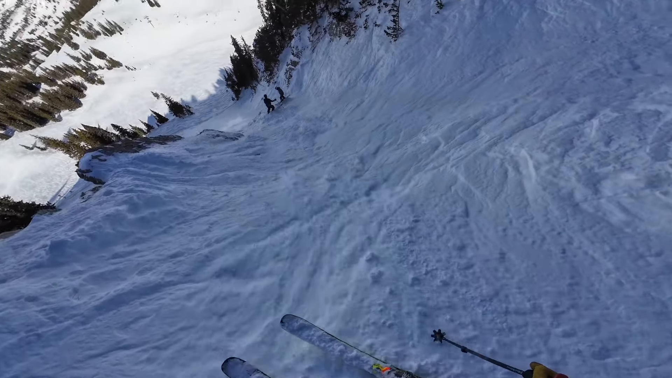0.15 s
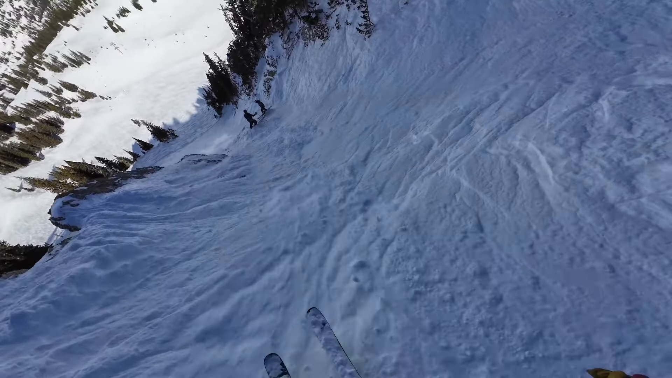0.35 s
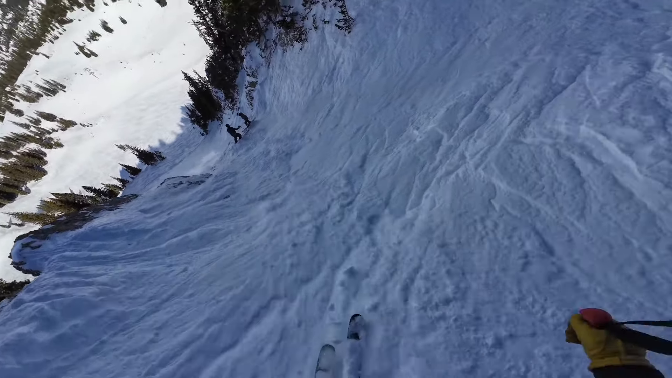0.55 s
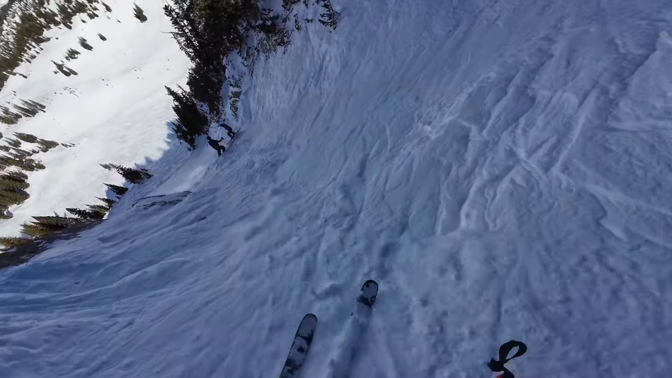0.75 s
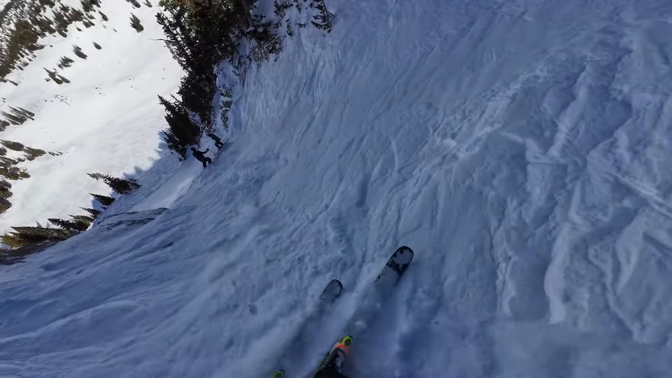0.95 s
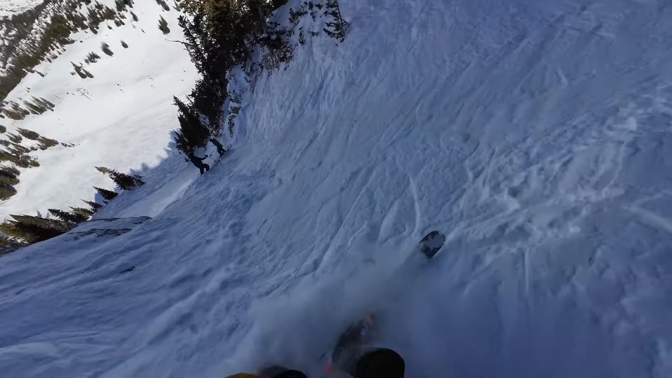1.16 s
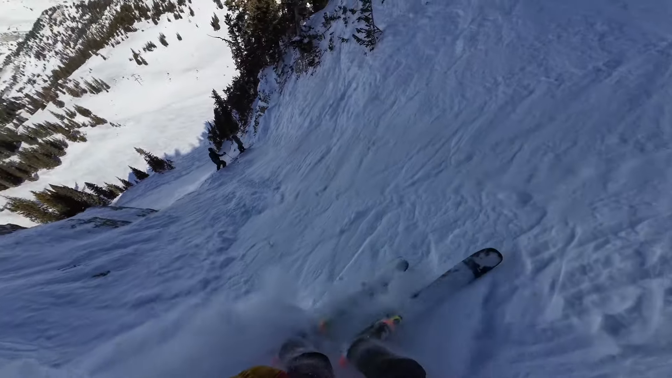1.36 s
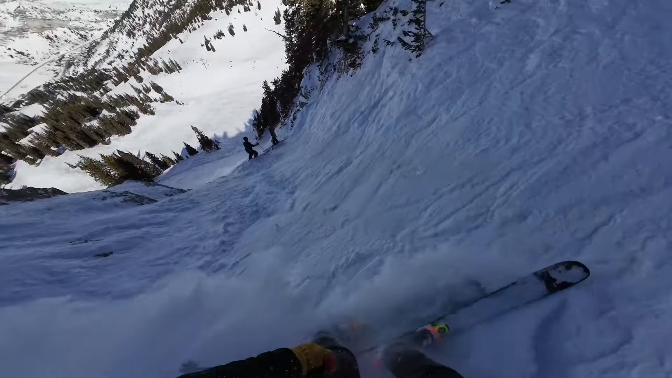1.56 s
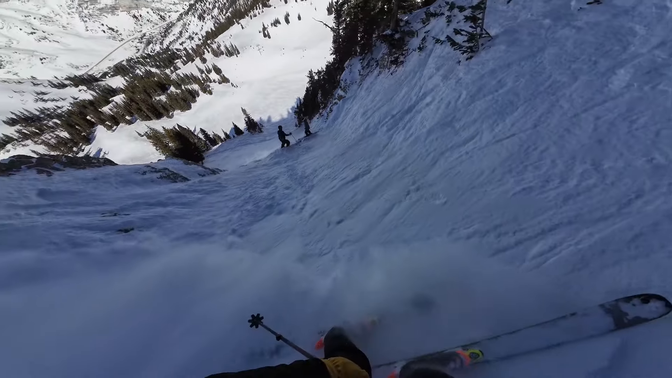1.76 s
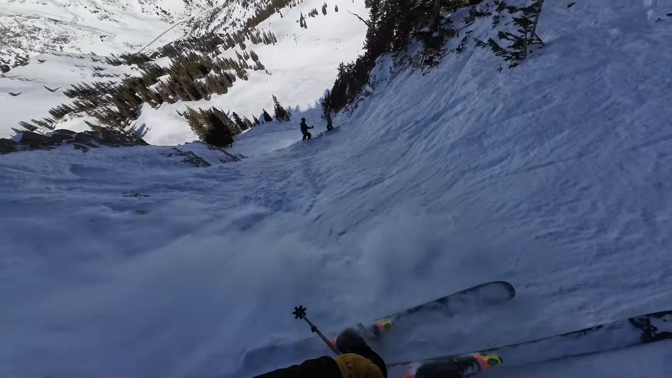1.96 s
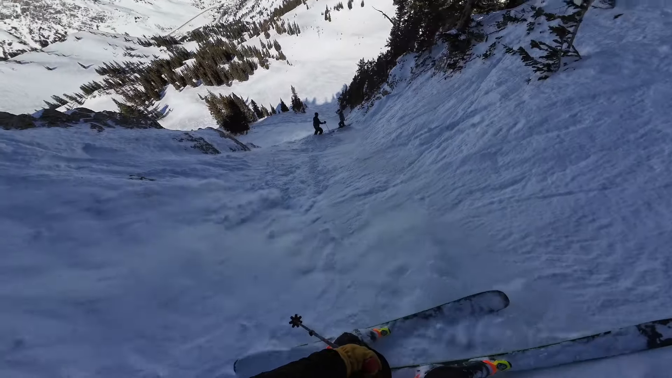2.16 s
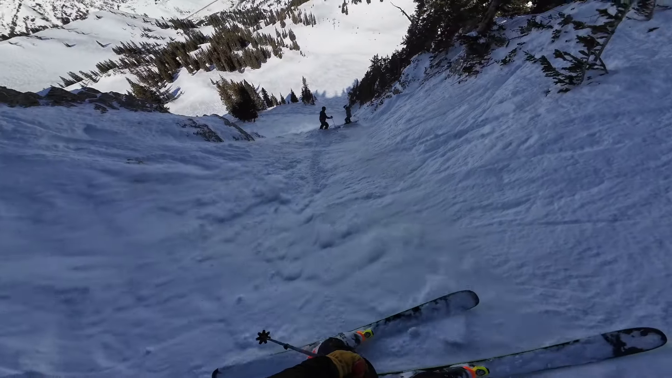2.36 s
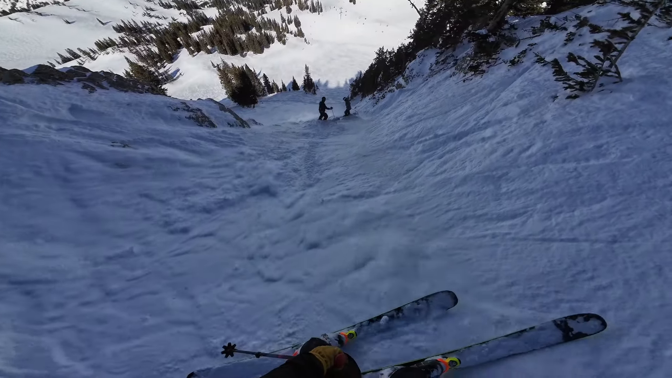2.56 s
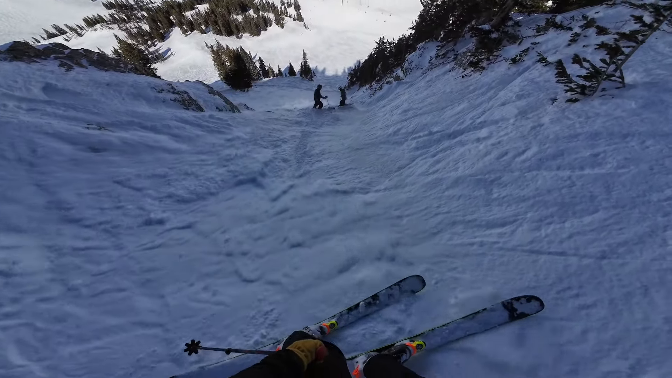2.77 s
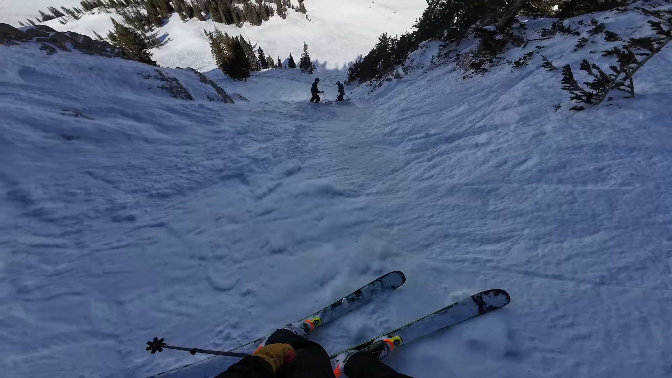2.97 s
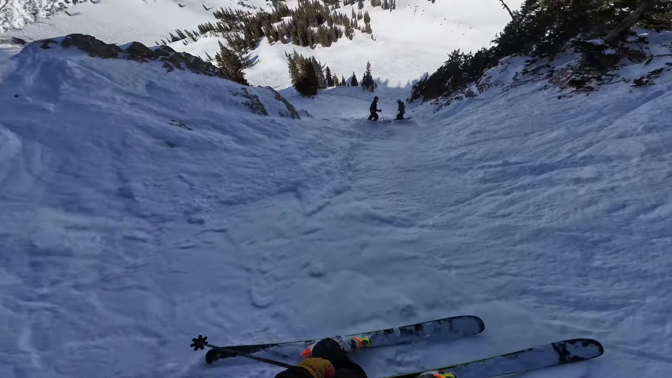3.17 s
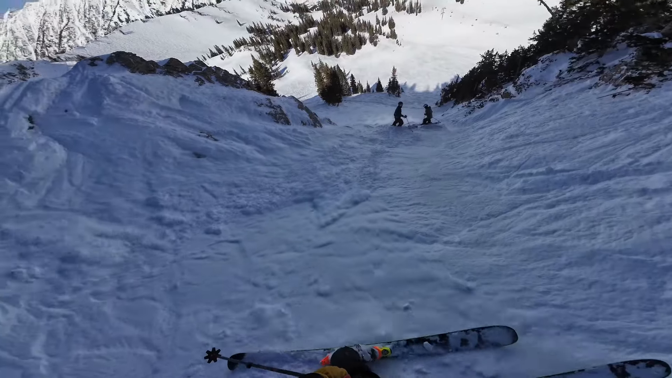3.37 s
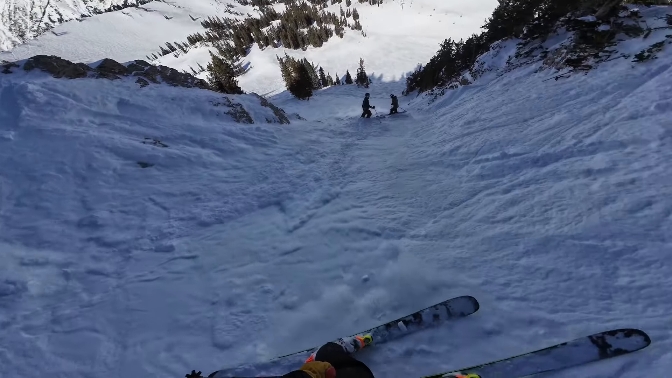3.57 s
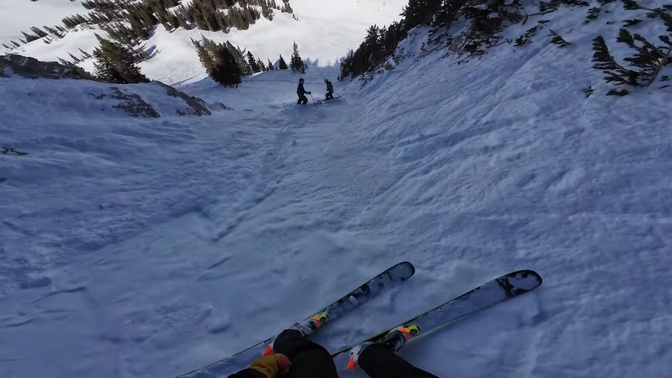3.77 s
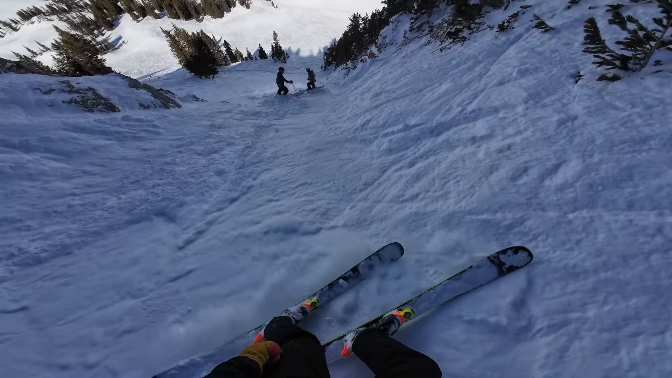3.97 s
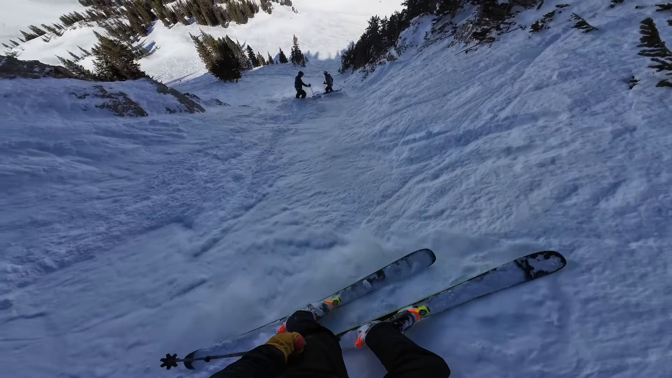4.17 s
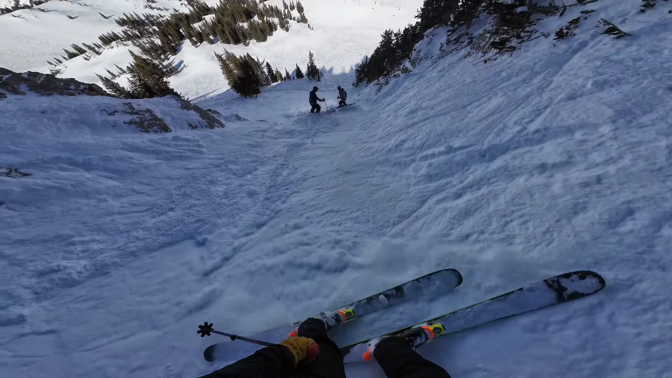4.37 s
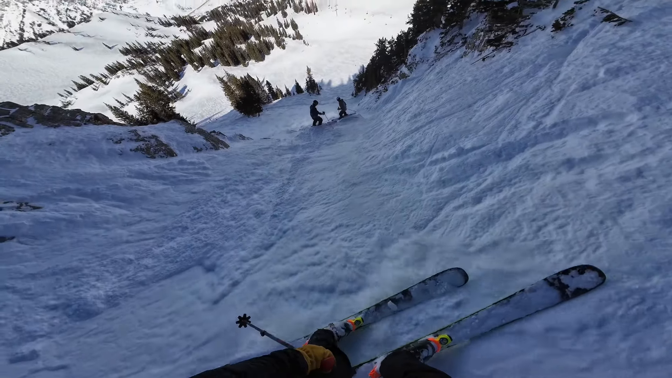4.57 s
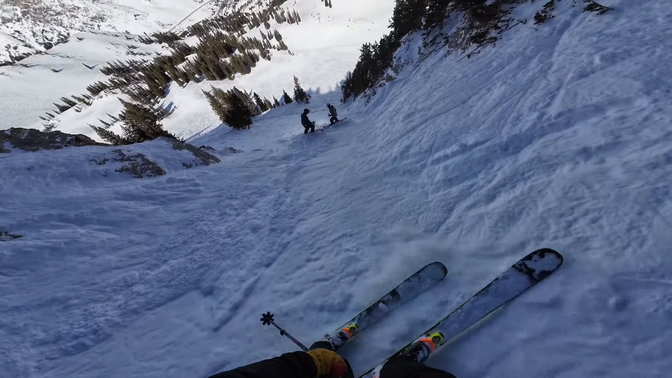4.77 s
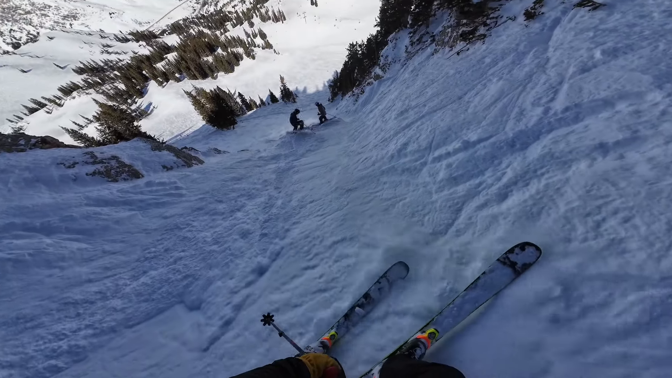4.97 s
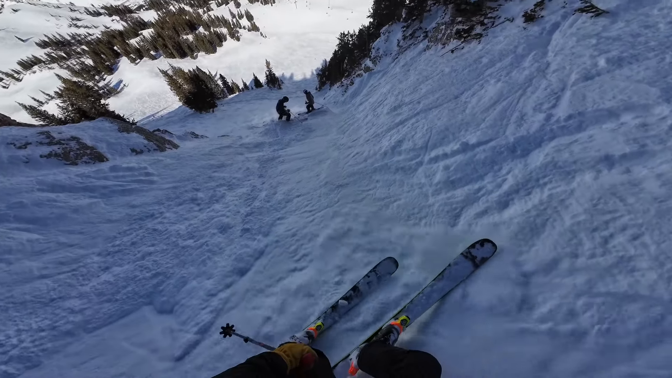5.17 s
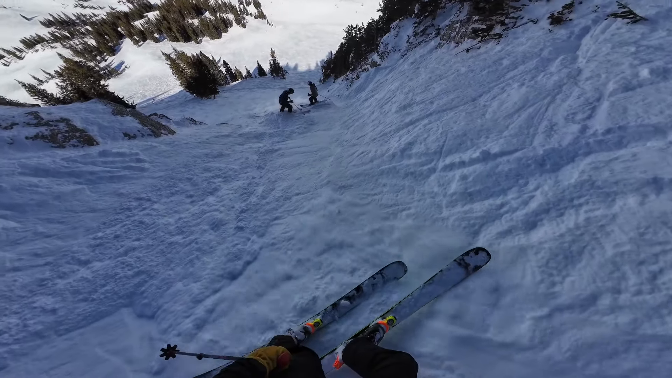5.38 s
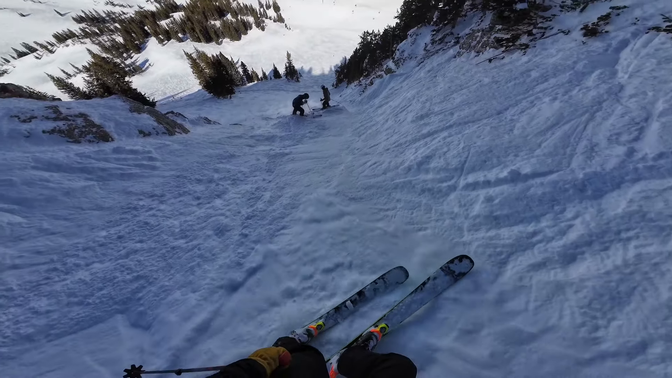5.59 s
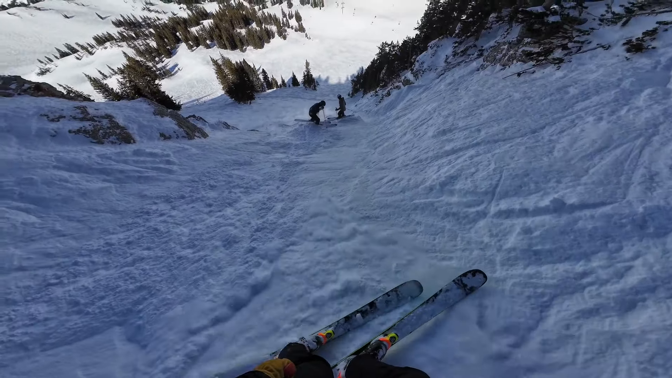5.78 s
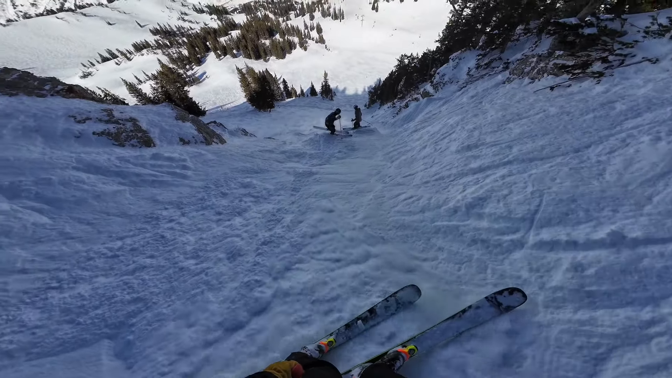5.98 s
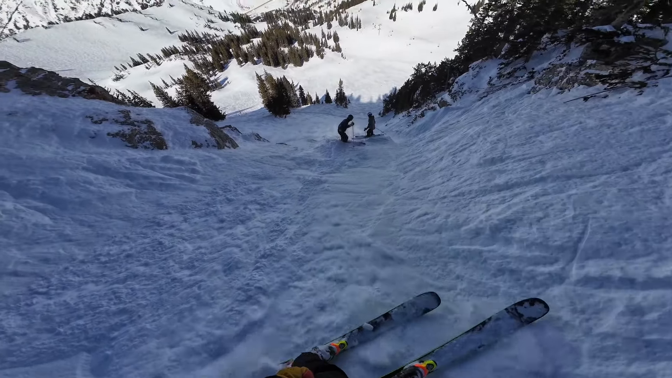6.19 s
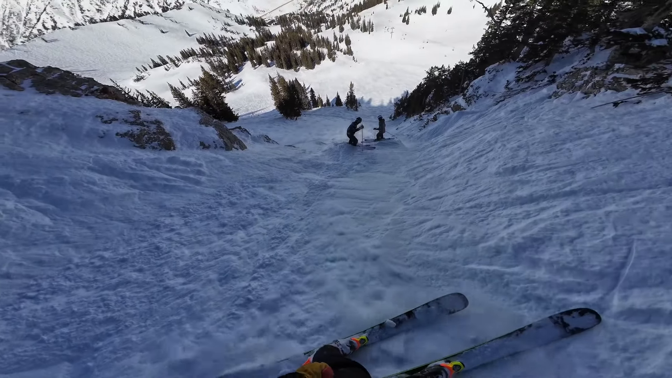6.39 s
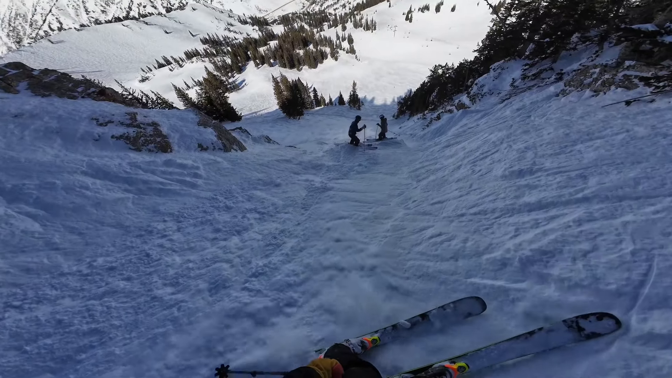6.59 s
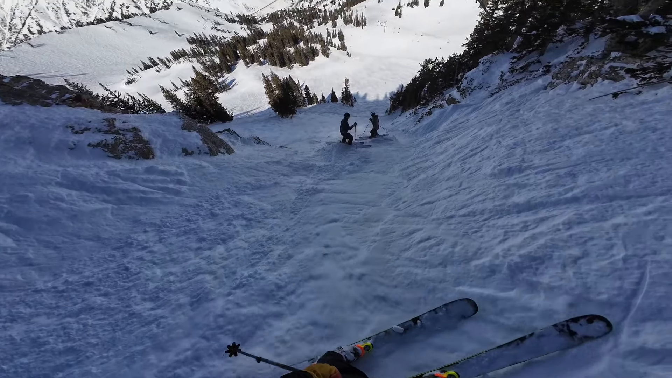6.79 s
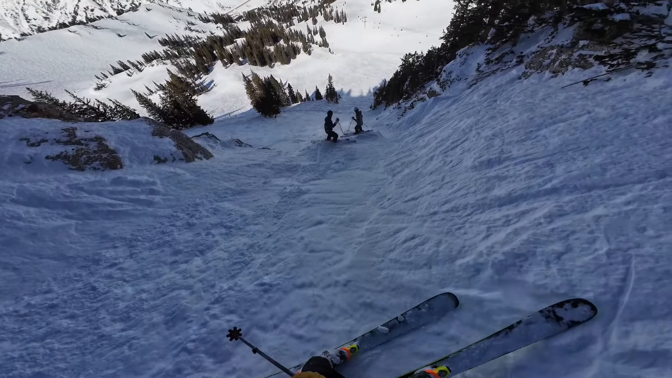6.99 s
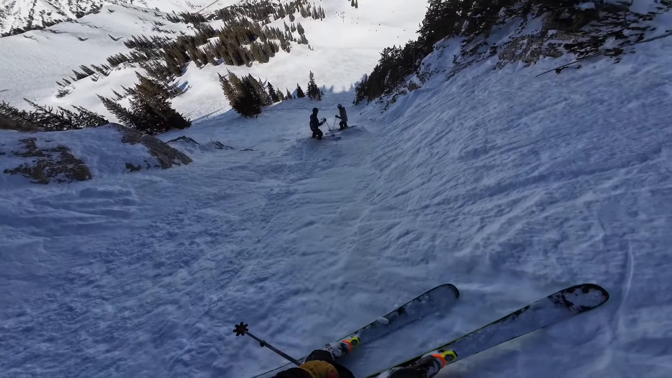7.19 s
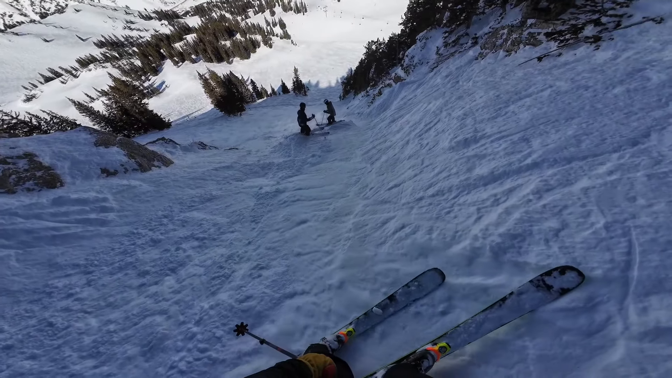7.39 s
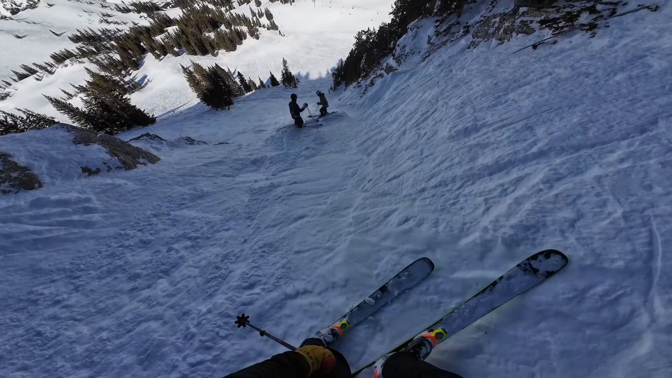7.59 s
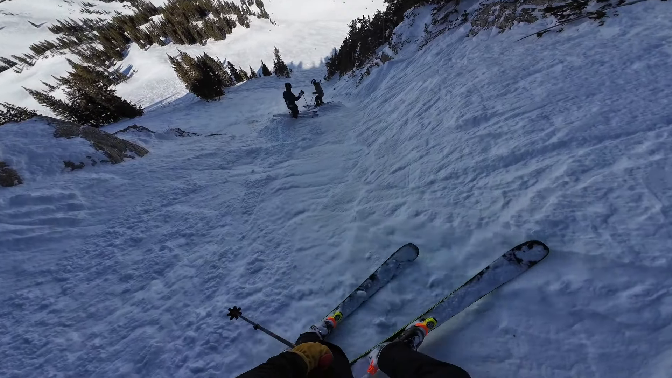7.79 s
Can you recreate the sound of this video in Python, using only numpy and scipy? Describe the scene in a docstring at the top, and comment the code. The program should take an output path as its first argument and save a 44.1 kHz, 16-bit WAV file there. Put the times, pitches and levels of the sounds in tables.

```python
"""Skidding down a windy gully

A skier drops into a steep gully, throws the skis sideways and skids down over chopped snow.
Skis: random grain clicks and noise, coloured and ringing, make the scrape, hiss, spray and crackle.
Wind on the helmet microphone: shaped noise rumbles, buffets and flutters; wandering sines throb in gusts.
Single eddies pop on the microphone port as short pressure swings with a higher crack."""
import sys
import numpy as np
from scipy import signal
from scipy.fft import rfft, irfft
from scipy.io import wavfile
from scipy.ndimage import uniform_filter1d

SR = 44100
rng = np.random.default_rng(int(sys.argv[2]) if len(sys.argv) > 2 else 0)


def to_wav(s):
    """Save 16-bit WAV."""
    ch = np.atleast_2d(s).T  # columns
    pcm = np.round(np.clip(ch, -1, 1) * 32767)  # PCM
    wavfile.write(sys.argv[1], SR, pcm.astype(np.int16))


N = 345744  # length [samples]

# Levels in the tables are starting points: the sources add trims and random movement.

# how hard the skis skid and how much powder they throw: (time [s], scrape level [dB], spray level [dB])
SKID_CURVE = [(0.0, -38.5, -47), (0.09, -43, -49.5), (0.3, -42.5, -48.5), (0.36, -44.5, -53),
              (0.51, -45.5, -50), (0.6, -35.5, -45), (0.78, -29, -42), (0.96, -29.5, -42),
              (1.01, -36, -45.5), (1.09, -25, -36.5), (1.7, -23, -36), (2.52, -25.5, -39),
              (2.64, -27, -39.5), (2.85, -24, -36), (3.3, -24.5, -40), (3.8, -22.5, -36),
              (4.28, -23.5, -35.7), (4.75, -24.5, -39.5), (5.02, -27.5, -42.5), (5.5, -27, -39.5),
              (5.94, -24.5, -40), (6.33, -20.5, -35), (6.56, -24.5, -38.5), (6.86, -31.5, -46.5),
              (7.04, -24.5, -38.5), (7.41, -29.5, -44), (7.52, -34, -49), (7.64, -30, -46.5),
              (7.78, -25, -41.5)]
# the edges dig in (+) or let go (-) for a moment:
# (centre time [s], length [s], scrape and spray change [dB], bite change [dB])
EDGE_DIGS = [(1.135, 0.054, 5.5, 8), (1.235, 0.03, -2, 4), (1.28, 0.06, 5.5, 4), (1.39, 0.18, -3, -0.5),
             (1.45, 0.092, 3.5, 2.5), (1.73, 0.11, -4, -2), (2.28, 0.074, -2, -2), (2.43, 0.062, -0.5, 2),
             (2.65, 0.18, 2.5, 5), (2.83, 0.1, 2, 3), (4.99, 0.2, 0, -3), (5.22, 0.09, 1, 5.5),
             (5.48, 0.24, 3.5, 4), (5.57, 0.058, -2.5, -5), (5.68, 0.13, 2, 1), (6.12, 0.16, 1.5, -0.5),
             (6.24, 0.16, 0, -2), (7.39, 0.14, 3, 3)]
# hollow colour of the scrape where the skis dig in:
# (time [s], resonance [Hz], level over the scrape grains [dB])
HOLLOW_GLIDE = [(0, 1350, -15), (0.5, 820, 6), (0.9, 900, -28), (1.27, 1950, -4), (1.6, 1440, -19),
                (2.8, 1760, -5), (3.05, 1690, -10), (3.36, 1400, -24), (3.6, 1450, -12), (4.3, 1470, -4),
                (4.98, 890, -36), (5.19, 1180, 1.5), (5.45, 1370, -17), (5.78, 1610, -2.5), (6.1, 960, -14),
                (6.42, 1880, -5.5), (6.7, 1490, -17), (7.25, 1350, -2), (7.55, 1590, -20), (7.8, 2090, -6)]
# faint gliding ring in the hiss as the edge angle changes:
# (time [s], resonance [Hz], level over the undulled bite [dB])
EDGE_RING_GLIDE = [(0, 2500, -2), (0.6, 2600, -28), (1.13, 3700, -8), (2.0, 2550, -14), (2.42, 2500, -2),
                   (2.7, 2600, -8), (3.7, 2630, -6), (4.1, 2940, -2.5), (4.7, 3550, -8), (5.0, 3230, -9),
                   (5.22, 3740, -20), (5.47, 4050, -8), (5.57, 4670, -11), (5.7, 4930, -7),
                   (5.9, 4700, -10), (6.1, 4450, -9), (6.35, 2600, -15), (6.55, 3000, -5),
                   (7.84, 2700, -25)]
# upper edge of the bite's hiss, rising and falling: (time [s], low-pass corner [Hz])
BITE_TOP_GLIDE = [(0, 5500), (1.25, 6840), (1.7, 6440), (2.1, 5300), (2.65, 7160), (3.15, 5550),
                  (3.55, 6600), (3.9, 5600), (4.4, 7460), (5.2, 4980), (5.5, 5360), (5.8, 4800),
                  (6.05, 5470), (6.35, 8000), (6.9, 7500), (7.3, 6040)]
# airflow on the microphone: (time [s], rumble level [dB], buffet level [dB])
WIND_CURVE = [(0.0, -43, -31), (0.07, -24, -23.5), (0.28, -31, -21.5), (0.6, -29, -19.5), (0.8, -19, -15),
              (1.4, -25, -15), (1.63, -30, -22), (1.72, -28, -26.5), (1.97, -27, -28), (2.06, -32, -22),
              (2.75, -33, -26), (3.15, -25.5, -18.5), (3.95, -35, -32), (4.32, -33, -25),
              (4.44, -42, -37.5), (5.05, -39.5, -33), (5.33, -29.5, -26.5), (6.6, -26.5, -34),
              (7.0, -14.5, -18.5), (7.17, -31.5, -25), (7.75, -26, -24), (7.84, -30, -32)]
# brief gusts on top of the airflow: (centre time [s], length [s], rumble change [dB], buffet change [dB])
GUST_SWELLS = [(.87, 0.082, 3, 5), (1.19, 0.068, 10, -9), (1.35, 0.086, 14.5, 0.5), (3.21, 0.079, 12, -6.5),
               (3.46, 0.053, 13, -3), (3.68, .08, 1, 7), (4.26, 0.066, 12, 1.5), (6.2, 0.086, 7.5, -1),
               (7.28, 0.11, 14, -8), (7.45, 0.055, 18, -2)]
# flurries of small eddies: (start time [s], hold length [s], level [dB])
EDDY_FLURRIES = [(0.064, 0.054, -24.5), (0.323, 0.29, -31), (0.661, 0.069, -22), (0.843, 0.15, -20.5),
                 (1.05, 0.14, -25), (1.492, 0.17, -22), (2.047, 0.087, -19), (2.178, 0.059, -22),
                 (2.332, 0.17, -22), (2.589, 0.16, -25.5), (2.912, 0.14, -23.5), (3.067, 0.025, -20),
                 (3.172, 0.26, -22), (3.467, 0.0085, -18), (3.62, 0.1, -26), (3.777, 0.055, -30.5),
                 (4.012, 0.18, -26), (5.562, 0.36, -32.5), (6.988, 0.14, -27.5), (7.254, 0.14, -27),
                 (7.445, 0.038, -23.5), (7.5, 0.083, -28), (7.592, 0.17, -21)]
# strongest eddies hitting the port: (centre time [s], swing level [dB], swing rate [Hz], crack level [dB])
PORT_POPS = [(0.110, -11, 900, -24), (0.115, -1, 390, -22), (0.201, -3.5, 266.5, -19),
             (0.689, -9.5, 332, -22), (0.906, -6, 330, -17), (0.956, -2, 296, -32), (1.008, 5, 120, -34),
             (1.117, -14, 480, -9), (1.131, -3.5, 258, -18), (1.183, 0.5, 288, -22), (1.55, -5, 200, -18),
             (2.037, -1.5, 230, -22), (2.062, -5, 328, -15), (2.069, -2, 300, -14), (2.087, -17, 280, -25),
             (2.096, -8, 380, -11), (2.117, -10, 201, -28), (2.183, -11, 220, -26), (2.371, -4, 332, -22),
             (2.412, -4, 277, -23), (2.483, -2.5, 287, -28), (2.924, -5, 258, -20), (2.965, -5.5, 218, -23),
             (3.093, -8, 301, -28), (3.105, 1, 280, -21), (3.183, 0.5, 206, -19), (3.229, 3, 170, -19),
             (3.317, -19, 400, -11), (3.404, -12, 400, -12), (3.471, -2, 129, -13), (3.68, 0.5, 190, -22),
             (4.167, -2, 267, -29), (4.289, -8, 100, -23), (5.327, -1, 196, -30), (5.598, -8, 280, -14),
             (5.644, -8.5, 138, -27), (5.706, -11, 298, -27), (5.785, -7, 320, -24),
             (6.705, -11.5, 179, -30), (6.935, -7, 179, -22), (6.964, 0, 89.5, -30), (6.991, -5, 218, -18),
             (7.001, -3, 228, -14), (7.016, -7, 260, -13), (7.062, -11, 278, -24), (7.08, -3, 226, -24),
             (7.131, -8, 270, -27), (7.26, -7, 262, -13), (7.361, -15, 260, -26), (7.444, 1.5, 110, -22),
             (7.474, 1, 282, -31), (7.595, -8, 250, -28), (7.723, -19, 270, -24)]
# throbs in the strongest gusts: (centre time [s], length [s], peak level [dB], mean rate [Hz])
GUST_THROBS = [(0.357, 0.073, -6.5, 87.6), (0.423, 0.045, -8, 85), (0.55, 0.033, -5, 110),
               (0.708, 0.074, -1.5, 100), (0.853, 0.11, -9.5, 90), (0.923, 0.046, -12, 129.4),
               (0.983, 0.095, -5.5, 105.1), (1.057, 0.042, -1.5, 119.6), (1.175, 0.046, -3.5, 94.6),
               (1.24, 0.059, -5, 91.2), (1.323, 0.05, -4.5, 85.2), (1.399, 0.062, -2.5, 100.5),
               (1.561, 0.062, -4.5, 115), (1.633, 0.033, -3, 115), (2.978, 0.026, -7, 118.6),
               (3.105, 0.02, -8, 140), (3.26, 0.066, -15.5, 130)]

# relative spectra of the snow layers: (frequency [Hz], density [dB per Hz])
SCRAPE_SPECTRUM = [(150, -12), (280, -4.5), (400, -2), (550, 1.5), (800, 2.5), (1200, 1), (1850, 0.5),
                   (2300, -9), (3000, -20), (5000, -13.5)]
BITE_SPECTRUM = [(1300, -27), (2100, 1.5), (2750, 3.5), (3300, -2), (4000, -3.5), (4800, -6.5), (5600, -12),
                 (6400, -8.5), (7200, -15.5), (10000, -11.5)]
SPRAY_SPECTRUM = [(3500, -26), (6000, 0), (7000, -6), (7900, 3), (8600, 0), (9500, 3.5), (10300, 3.5),
                  (11000, -1.5), (12300, -1), (13200, 4.5), (14200, -2.5), (15700, -9)]
CRUMB_SPECTRUM = [(400, -26), (1200, 8), (2500, -6), (5000, 8), (8000, -16)]
# relative spectra of the wind, from large eddies to fine: (frequency [Hz], density [dB per Hz])
RUMBLE_SPECTRUM = [(12, -3), (22, 0), (35, 1.5), (55, 0.5), (80, -3.5), (140, -43)]
BUFFET_SPECTRUM = [(35, -21), (60, -2), (90, -1), (125, -2.5), (170, -12.5), (250, -18.5), (500, -38)]
FLUTTER_SPECTRUM = [(100, 1.5), (160, 4), (220, 0.5), (310, -5), (450, -10), (700, -17), (1200, -36),
                    (2500, -73)]
FINE_EDDY_SPECTRUM = [(300, -4.5), (550, -3), (1200, -12.5)]

# the bite sits at BITE_DB when the scrape is at FULL_SKID_DB, and moves BITE_FOLLOWS dB per scrape dB
FULL_SKID_DB, BITE_DB, BITE_FOLLOWS = -24.5, -29, 1.07
PATCH_LOW_HZ, PATCH_HIGH_HZ = 400, 9000  # centres of the lowest and highest snow-patch bands
FLURRY_ATTACK_S, FLURRY_RELEASE_S = 0.0087, 0.039
# centre pitch of the cracks, cycles until they fade to 1/e, and largest random detune
CRACK_HZ, CRACK_CYCLES, CRACK_SPREAD_OCTAVES = 800, 1, 0.32
CUTOFF_HZ = 15600


def from_db(db):
    """Decibels to gain."""
    return 10 ** (np.asarray(db) / 20)


def rms_one(x):
    """Scale to unit rms."""
    return x / np.sqrt(np.mean(x ** 2) + 1e-20)


def in_time(rows):
    """Each column of a curve, drawn as straight lines at every sample."""
    s, *columns = np.transpose(rows)
    return [np.interp(np.arange(N) / SR, s, c) for c in columns]


def swells(rows):
    """Each row (centre, length, dB, dB) is a smooth rise and fall of two levels."""
    t = np.arange(N) / SR
    return sum(np.outer(db, np.exp(-(2 * (t - s) / length) ** 2)) for s, length, *db in rows)


def drift(rate):
    """Smooth chance with spread 1, changing about rate times a second."""
    step = 40  # samples between points of the slow noise
    r = np.exp(-2 * np.pi * rate * step / SR)
    noise = rng.standard_normal(N // step + 2002)
    slow = signal.lfilter([1], [1, -2 * r, r * r], noise)[2000:]  # drop the filter's start-up
    return np.interp(np.arange(N) / step, np.arange(len(slow)), rms_one(slow))


def coloured(x, spectrum):
    """Give x a spectrum that falls away by a further 24 dB per octave beyond its ends; rms 1."""
    hz, db = np.transpose(spectrum)
    octave = np.log2(np.maximum(np.arange(N // 2 + 1) * SR / N, 1))
    outside = np.abs(octave - np.clip(octave, np.log2(hz[0]), np.log2(hz[-1])))
    gain = from_db(np.interp(octave, np.log2(hz), db) - 24 * outside)
    return rms_one(irfft(rfft(x) * gain, N))


def grains(per_s, spread_db):
    """Snow crystals break at random moments as single clicks, many small and a few large."""
    sizes = from_db(spread_db * np.minimum(rng.exponential(1, N), 4.5))
    signs = rng.choice([-1, 1], N)
    return rms_one(sizes * signs * (rng.random(N) < per_s / SR))


def resonant(rows, width_hz):
    """Noise twice through a resonance that glides along rows, at the rows' level."""
    hz, db = in_time(rows)
    x, r = rng.standard_normal(N), np.exp(-np.pi * width_hz / SR)
    block, state = 256, np.zeros((2, 2))  # the pitch steps once per block
    for i in range(0, N, block):
        section = [1, 0, -1, 1, -2 * r * np.cos(2 * np.pi * hz[i] / SR), r * r]
        x[i:i + block], state = signal.sosfilt([section, section], x[i:i + block], zi=state)
    return rms_one(x) * from_db(db)


def dulled(x, rows):
    """A steep sixth-order low-pass whose corner glides along rows."""
    w, out = 2 * np.pi * in_time(rows)[0] / SR, np.zeros(N)
    block, state = 512, np.zeros((3, 2))  # the corner steps once per block
    for i in range(0, N, block):
        c = np.cos(w[i])
        damping = np.sin(w[i]) * np.cos(np.pi * np.array([1, 3, 5]) / 12)  # Butterworth pole angles
        sections = [np.array([(1 - c) / 2, 1 - c, (1 - c) / 2, 1 + d, -2 * c, 1 - d]) / (1 + d)
                    for d in damping]
        out[i:i + block], state = signal.sosfilt(sections, x[i:i + block], zi=state)
    return out


def clumps(per_s, crumble_s, spread_db):
    """Lumps of snow meet the edge at random: each is a sudden surge that crumbles away; mean power 1."""
    sizes = from_db(spread_db * np.minimum(rng.exponential(1, N), 3))
    hits = sizes * (rng.random(N) < per_s / SR)
    surge = signal.lfilter([1], [1, -np.exp(-1 / (crumble_s * SR))], hits ** 2 + 1e-18)
    return rms_one(np.sqrt(1 + surge))


def patchy(x, patchy_db, per_s, count):
    """Uneven snow favours now one narrow band, now another; each of count bands swells by its own chance."""
    hz = np.arange(N // 2 + 1) * SR / N
    # bands are evenly spaced in the square root of frequency and cross-fade into their neighbours
    place = np.interp(np.sqrt(hz), np.sqrt([PATCH_LOW_HZ, PATCH_HIGH_HZ]), [0, count - 1])
    spectrum, out = rfft(x), np.zeros(N)
    for k in range(count):
        band = irfft(spectrum * np.clip(1 - np.abs(place - k), 0, 1), N)
        out += band * from_db(patchy_db * drift(per_s))
    return rms_one(out) * np.std(x)


def skis(chatter_db=0.43, uneven_db=1.1):
    """Bases crush snow, edges shave it, thrown powder hisses; the harder the skid, the more the edges bite."""
    scrape_db, spray_db = in_time(SKID_CURVE)
    dig_db, dig_bite_db = swells(EDGE_DIGS)
    bite_db = BITE_DB + BITE_FOLLOWS * (scrape_db - FULL_SKID_DB)

    # an edge digging in breaks off coarser crumbs
    digging = np.sqrt(np.clip(1 - from_db(-dig_bite_db), 0, 1))
    crumbs = from_db(-9.0) * digging * coloured(grains(per_s=410, spread_db=3.0), CRUMB_SPECTRUM)
    scrape_grains = coloured(grains(per_s=7000, spread_db=2.0), SCRAPE_SPECTRUM)
    scrape = crumbs + scrape_grains + resonant(HOLLOW_GLIDE, width_hz=580)
    bite_grains = coloured(grains(per_s=14000, spread_db=2.0), BITE_SPECTRUM)
    bite = dulled(bite_grains, BITE_TOP_GLIDE) + resonant(EDGE_RING_GLIDE, width_hz=920)
    spray = coloured(grains(per_s=20000, spread_db=2.0), SPRAY_SPECTRUM)

    surges = clumps(per_s=45, crumble_s=0.014, spread_db=-0.33)  # negative: large draws hit slightly softer
    crushed = scrape * from_db(scrape_db + dig_db - 0.9) * surges
    shaved = bite * from_db(bite_db + dig_bite_db)
    # powder flies up unevenly
    thrown = spray * from_db(spray_db + dig_db + 0.15 + uneven_db * drift(7.4))
    skid = patchy(crushed + shaved, patchy_db=1.5, per_s=8, count=40)
    return (skid + thrown) * from_db(chatter_db * drift(37))  # ruts shake the whole ski at once


def turbulence(spectrum, even_s):
    """Low noise whose strength is evened over even_s, so that it swings on steadily."""
    x = coloured(rng.standard_normal(N), spectrum)
    power = uniform_filter1d(x * x, max(int(even_s * SR), 1))
    return rms_one(x / np.sqrt(np.abs(power) + .05))  # the small floor limits the lift of quiet spots


def flurry_gain():
    """Each flurry sets in quickly, holds and dies away."""
    t, gain = np.arange(N) / SR, np.zeros(N)
    for s, length, db in EDDY_FLURRIES:
        corners = [s - FLURRY_ATTACK_S, s, s + length, s + length + FLURRY_RELEASE_S]
        gain += from_db(db) * np.interp(t, corners, [0, 1, 1, 0])
    return gain


def wind(lumpy_db=4.0, gusty_db=2.5, calm_flutter_db=-9.5, flurry_db=1.5, fine_db=2.0):
    """Large eddies rumble, middle ones buffet, small ones flutter faintly along and tear off in flurries."""
    rumble_db, buffet_db = in_time(WIND_CURVE) + swells(GUST_SWELLS) + gusty_db * drift(17.2)
    rumble = turbulence(RUMBLE_SPECTRUM, even_s=0.119) * from_db(rumble_db + 1.5)
    buffet = turbulence(BUFFET_SPECTRUM, even_s=0.059) * from_db(buffet_db + 0.1)

    lumps = rng.standard_normal(N) * from_db(lumpy_db * np.clip(drift(61), -2, 1.2))
    flurry = from_db(flurry_db) * flurry_gain()
    flutter_gain = np.hypot(from_db(buffet_db + calm_flutter_db), flurry)
    flutter = coloured(lumps, FLUTTER_SPECTRUM) * flutter_gain
    # the hardest flurries break into finer eddies
    fine = coloured(lumps, FINE_EDDY_SPECTRUM) * from_db(fine_db) * flurry ** 2
    return rumble + buffet + flutter + fine


def pops(length_cycles=0.41, lopsided=0.84):
    """An eddy crossing the port is one pointed pressure swing with a short, higher crack on top."""
    out, t = np.zeros(N), np.arange(N) / SR
    chances = rng.uniform(-0.99, 1, (len(PORT_POPS), 3))
    for (s, db, hz, crack_db), (lean, turn, detune) in zip(PORT_POPS, chances):
        near = np.abs(t - s) < 3 / hz
        cycles = (t[near] - s) * hz
        crack_cycles = (t[near] - s) * CRACK_HZ * 2 ** (CRACK_SPREAD_OCTAVES * detune)
        swing_shape = np.exp(-np.abs(cycles / length_cycles) ** 1.16)
        swing = swing_shape * np.cos(2 * np.pi * cycles + lopsided * lean)
        crack = np.exp(-(crack_cycles / CRACK_CYCLES) ** 2) * np.cos(2 * np.pi * crack_cycles + turn)
        out[near] += from_db(db) * swing + from_db(crack_db) * crack
    return out


def throbs(wander_octaves=0.42, unsteady_db=2.0):
    """In strong gusts vortices peel off the helmet almost regularly, wandering in rate and strength."""
    out, t = np.zeros(N), np.arange(N) / SR
    clock = np.cumsum(2 ** (wander_octaves * drift(85.8))) / SR  # time that runs unevenly
    for s, length, db, hz in GUST_THROBS:
        near = np.abs(t - s) < length
        shape = np.exp(-(2 * np.abs(t[near] - s) / length) ** 3)
        out[near] += from_db(db) * shape * np.sin(2 * np.pi * hz * clock[near])
    return out * from_db(unsteady_db * drift(48))


def scene():
    """Skis below, wind right on the microphone."""
    snow = skis()
    air = wind() + from_db(-3.5) * throbs() + from_db(-3.0) * pops()
    # the port chokes on the strongest gusts: a soft ceiling at 0.9
    choked = air / (1 + (air / .9) ** 6) ** (1 / 6)
    return (snow + choked)[None]


def record(dry):
    """A steep low-pass cuts the top and peaks stop at full scale."""
    low_pass = signal.ellip(12, .1, 90, CUTOFF_HZ, fs=SR, output="sos")
    return np.clip(signal.sosfilt(low_pass, dry), -1, 1)


dry = scene()
out = record(dry)
to_wav(out)
```